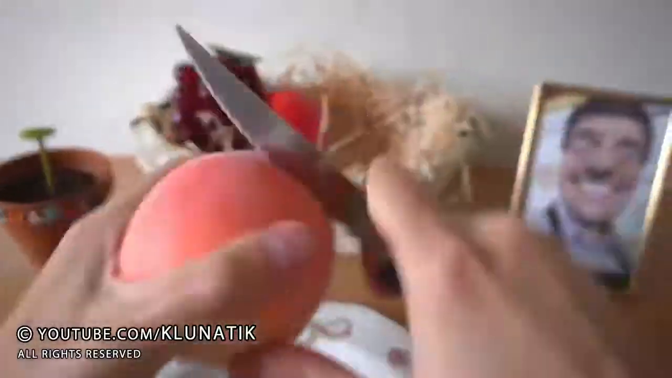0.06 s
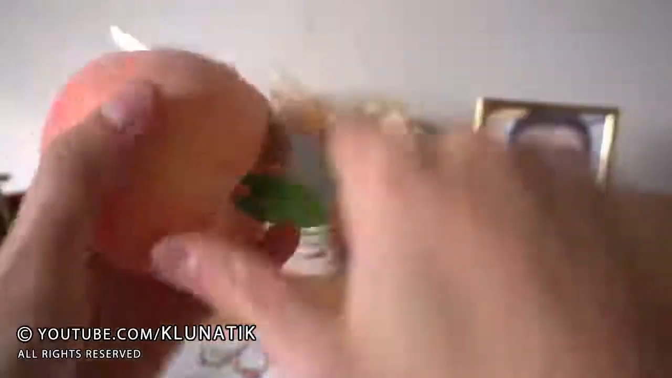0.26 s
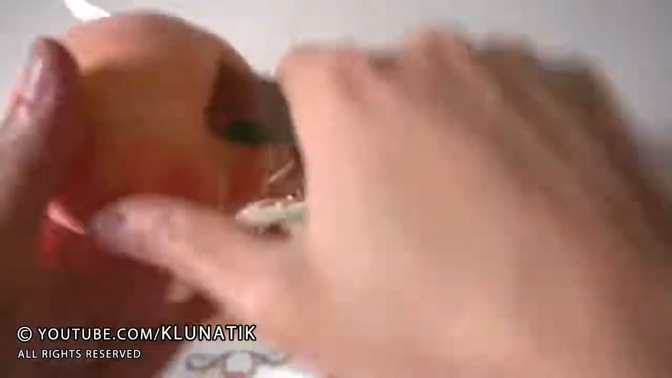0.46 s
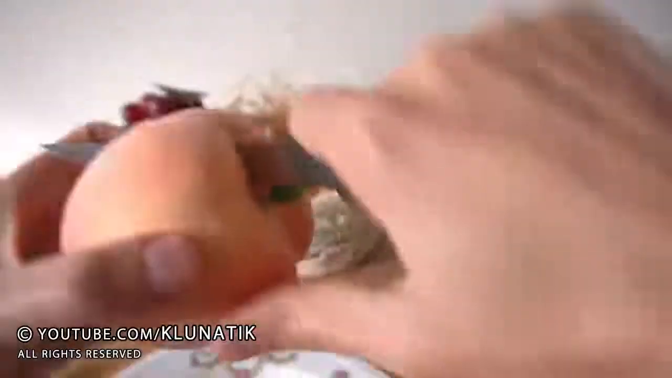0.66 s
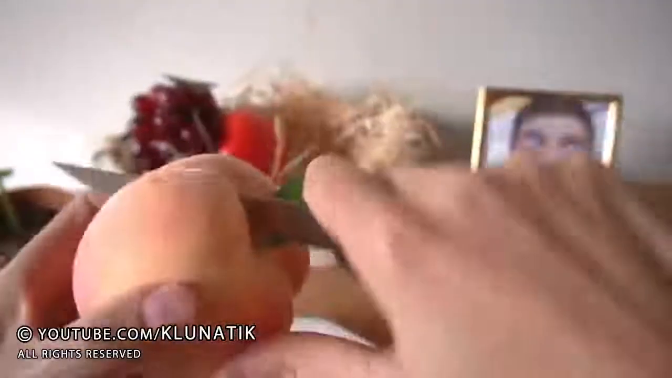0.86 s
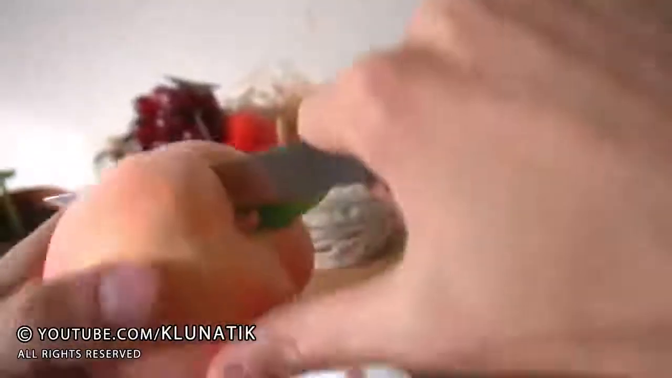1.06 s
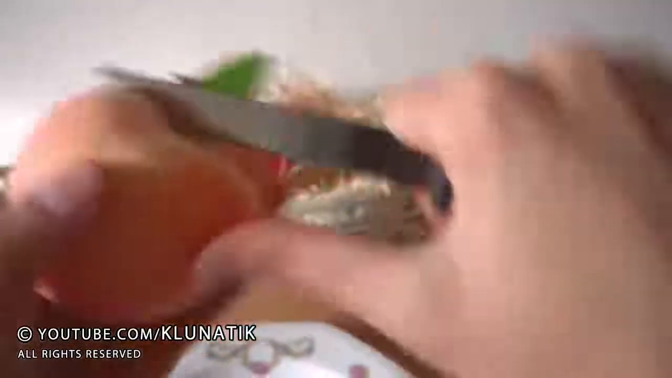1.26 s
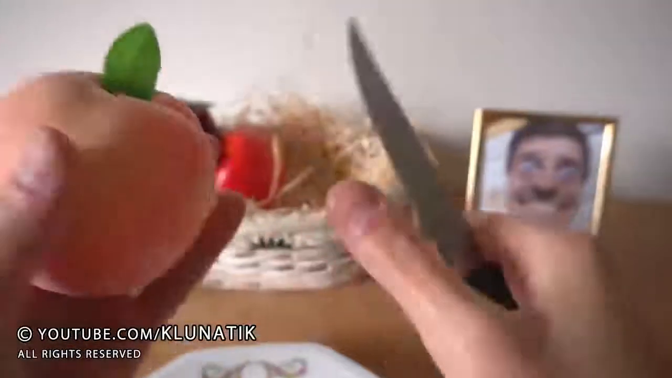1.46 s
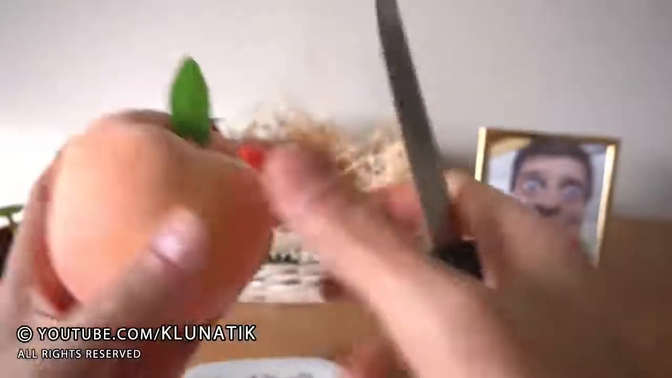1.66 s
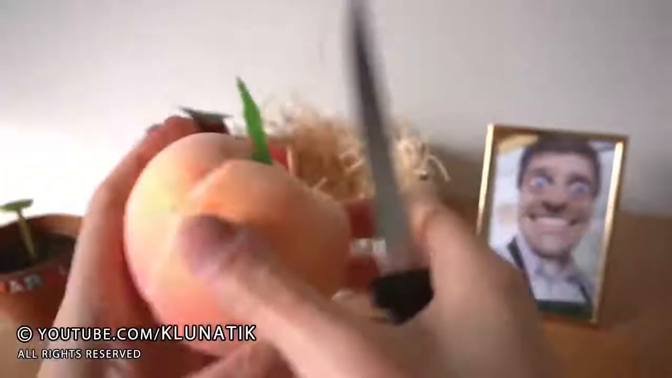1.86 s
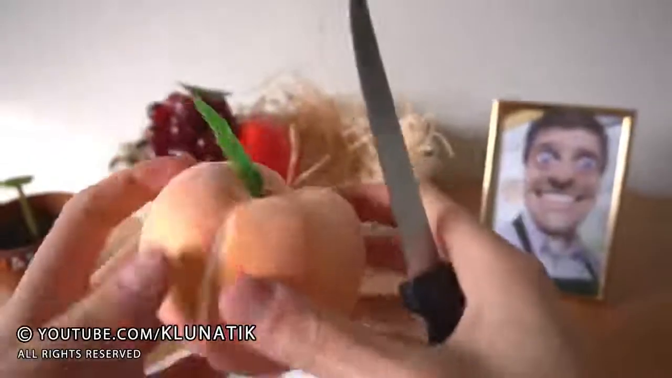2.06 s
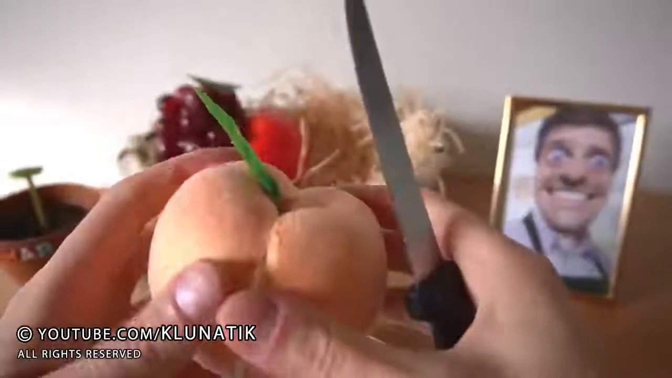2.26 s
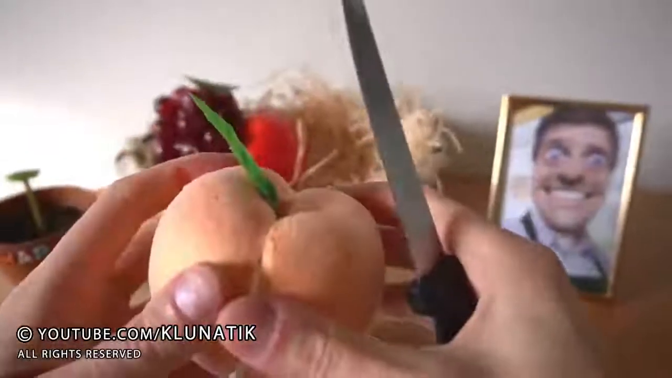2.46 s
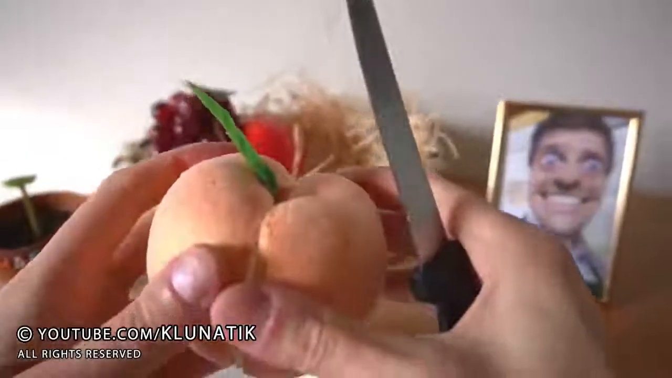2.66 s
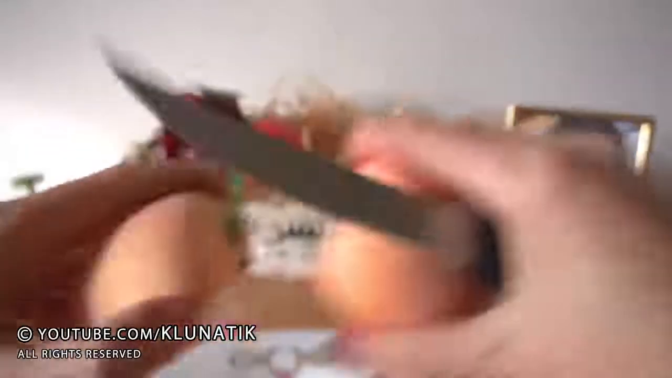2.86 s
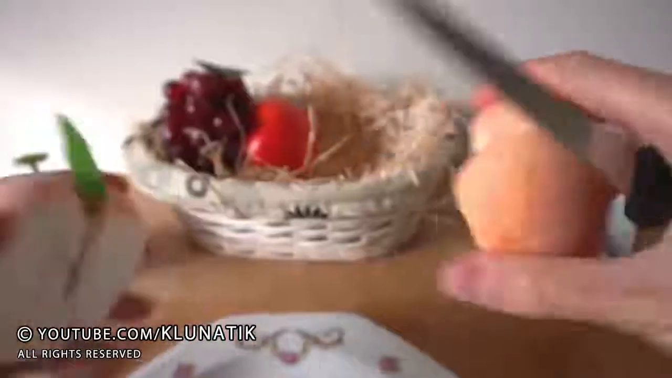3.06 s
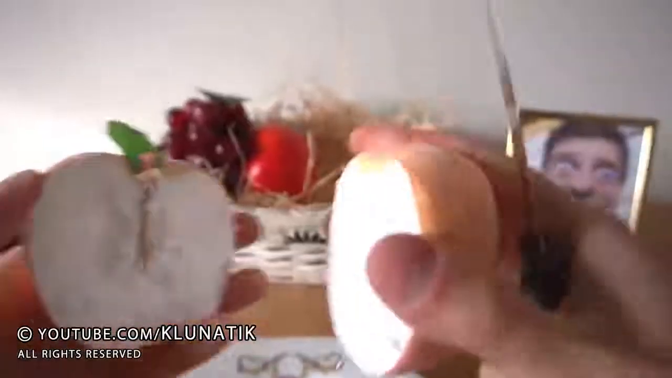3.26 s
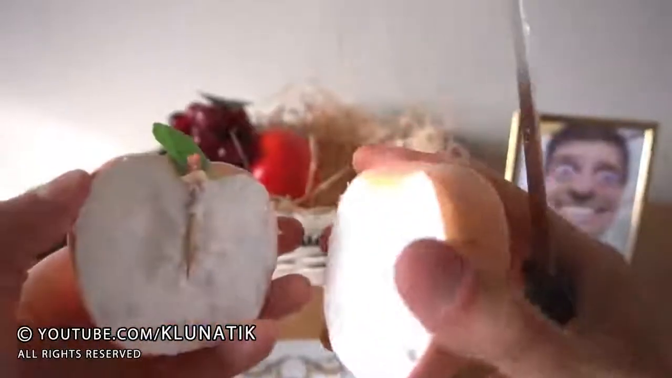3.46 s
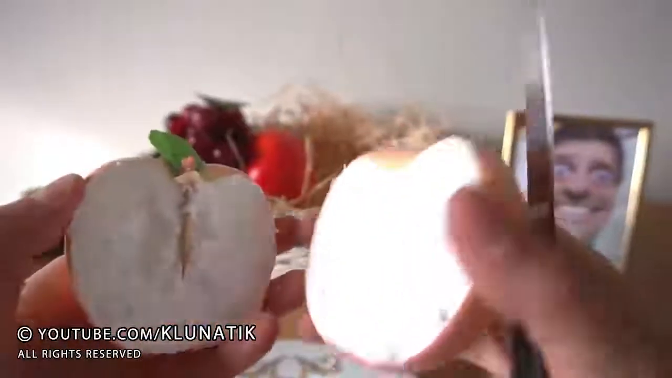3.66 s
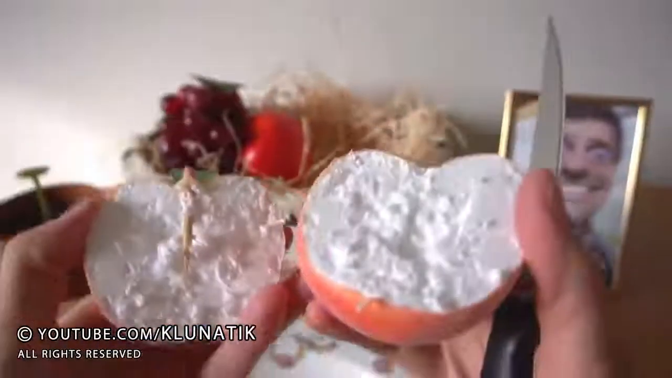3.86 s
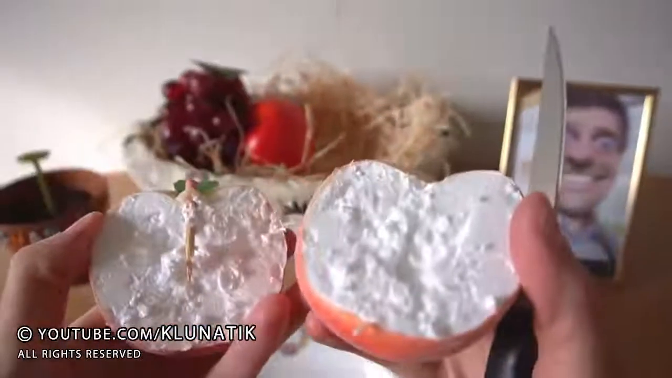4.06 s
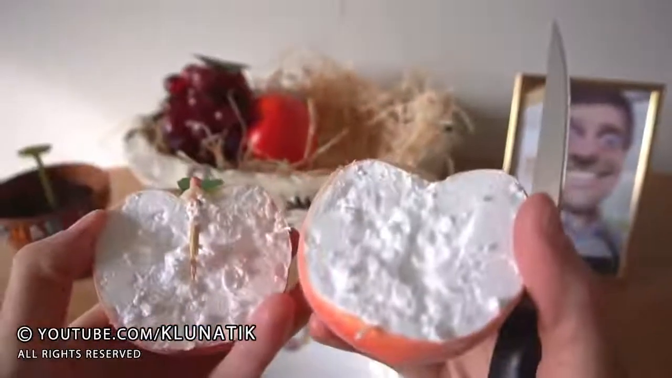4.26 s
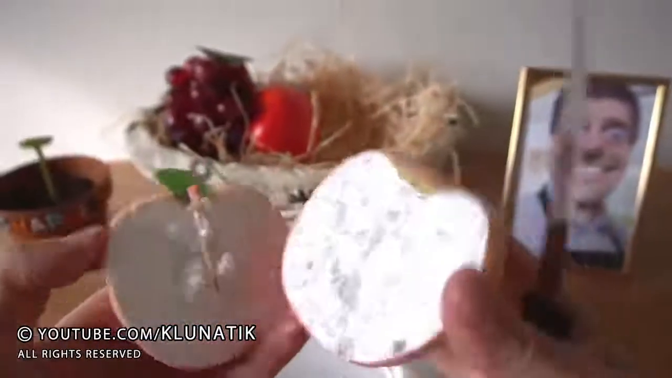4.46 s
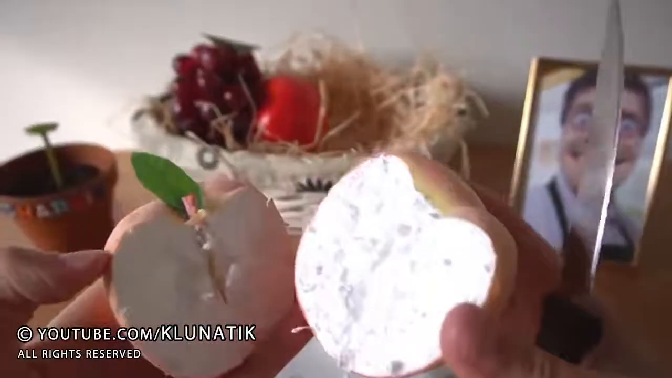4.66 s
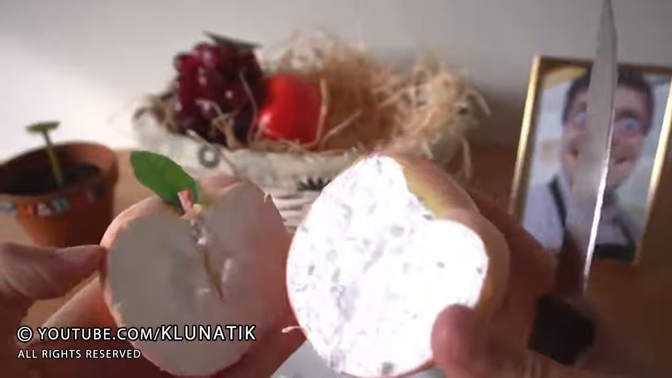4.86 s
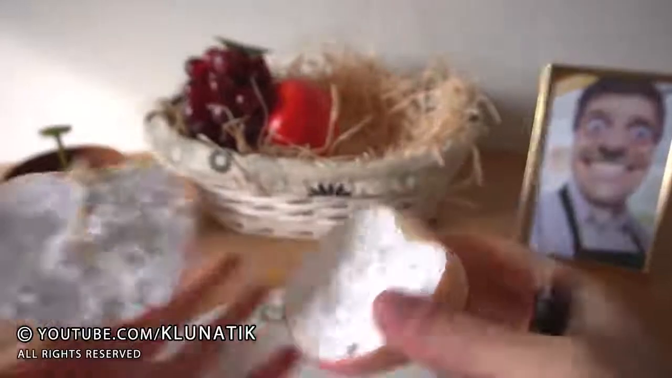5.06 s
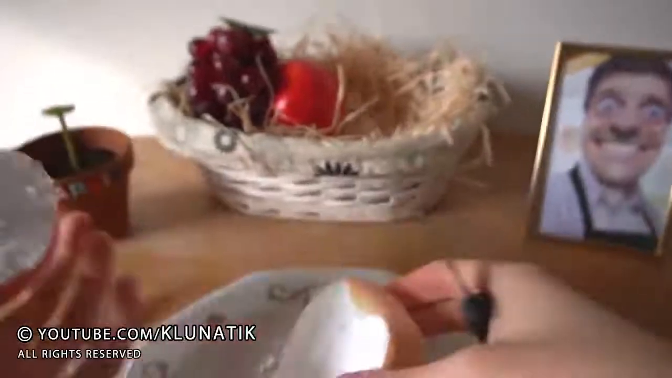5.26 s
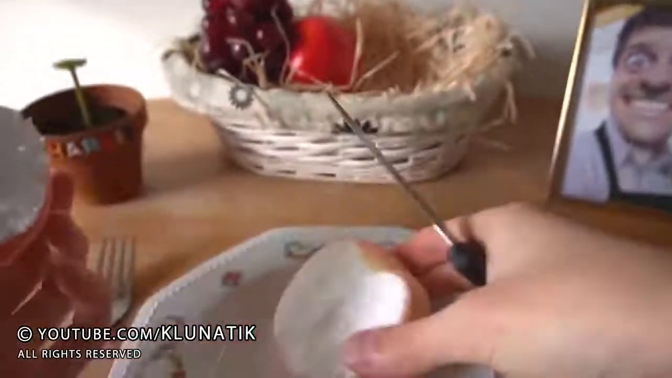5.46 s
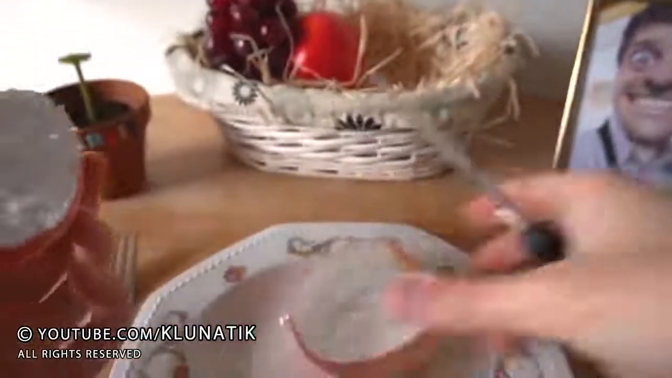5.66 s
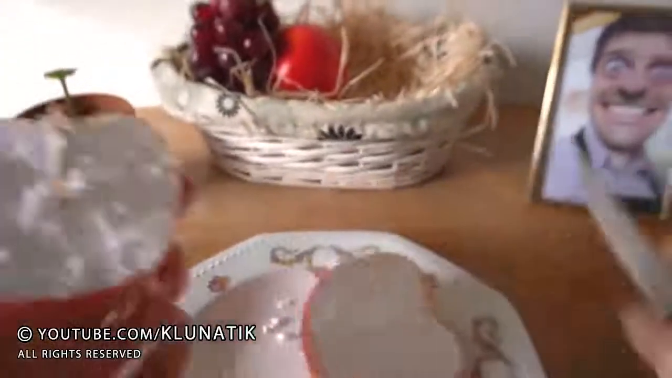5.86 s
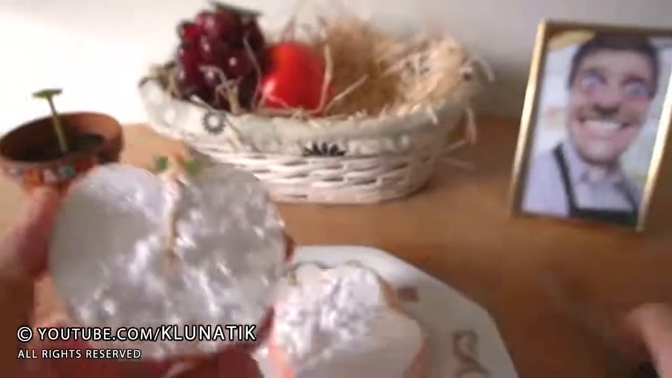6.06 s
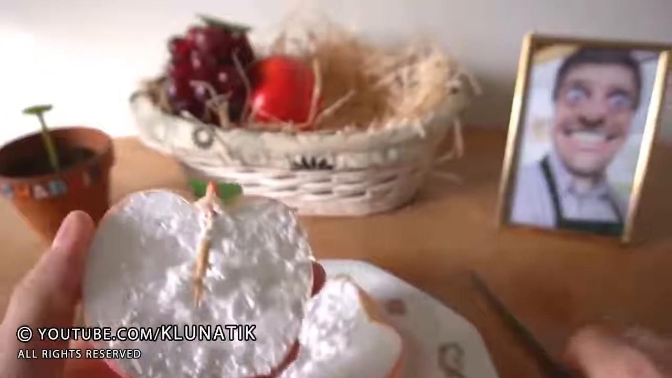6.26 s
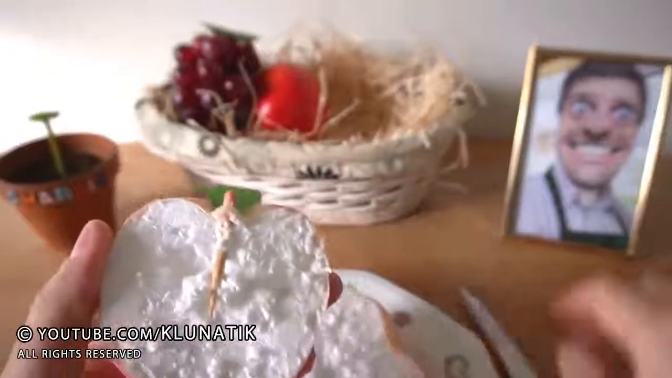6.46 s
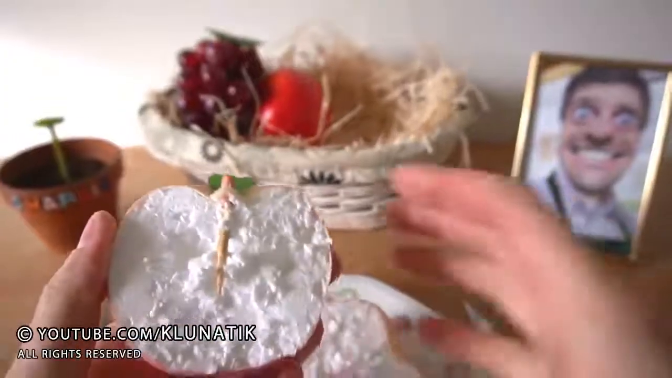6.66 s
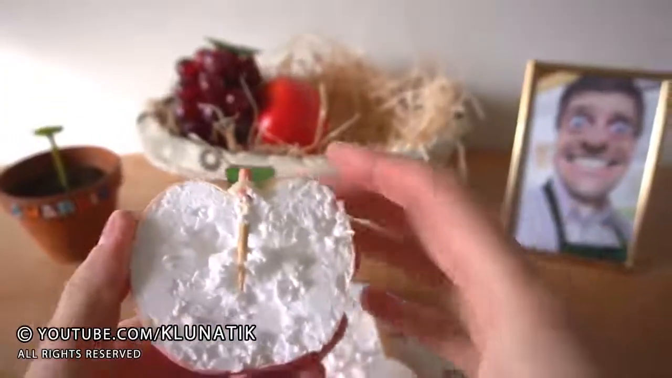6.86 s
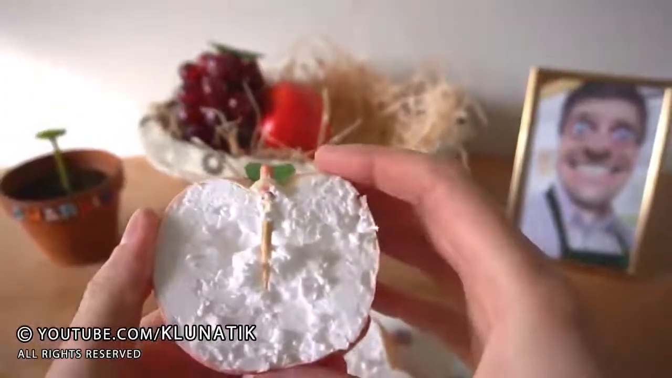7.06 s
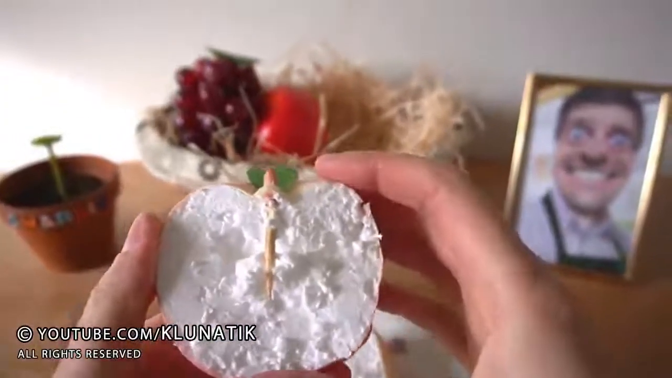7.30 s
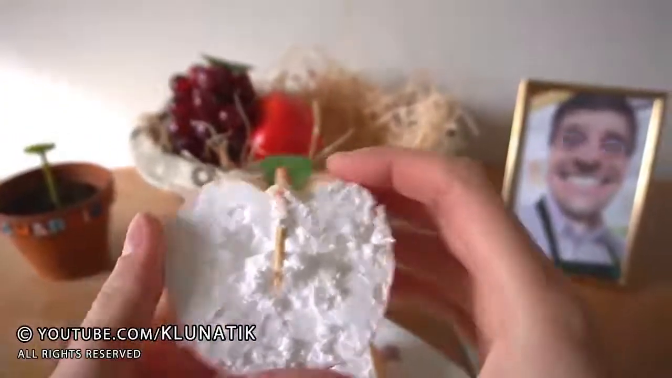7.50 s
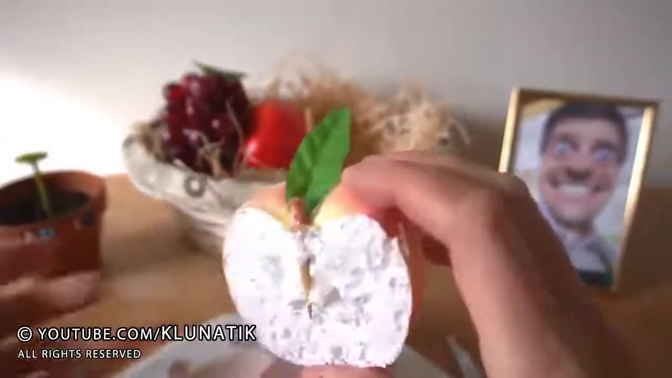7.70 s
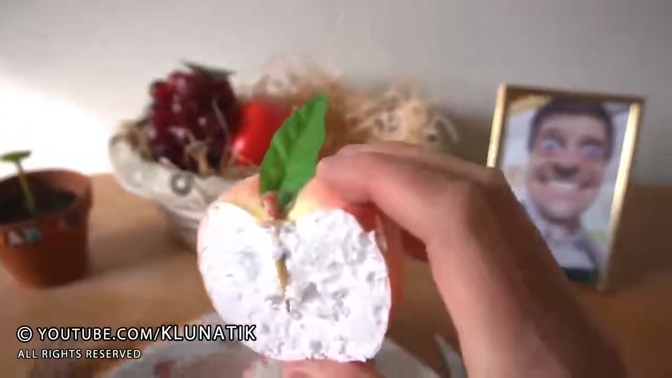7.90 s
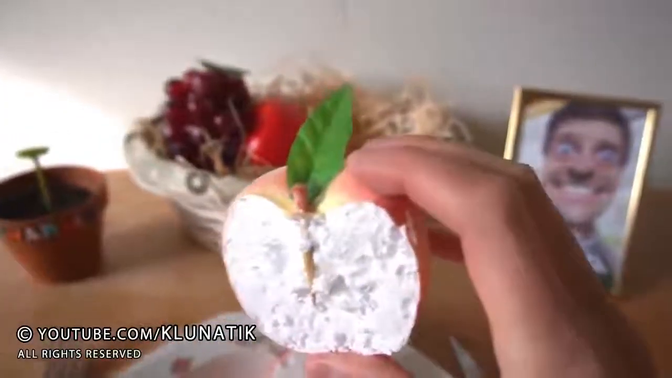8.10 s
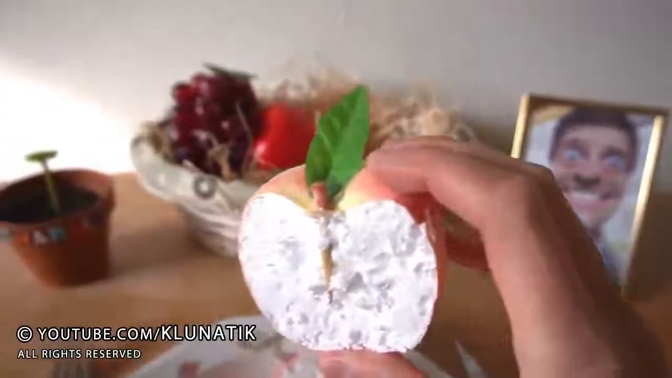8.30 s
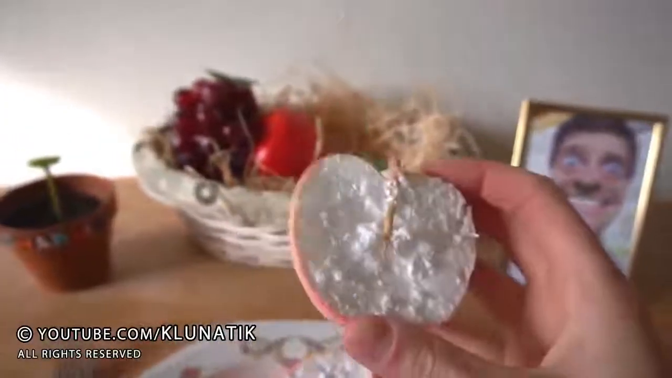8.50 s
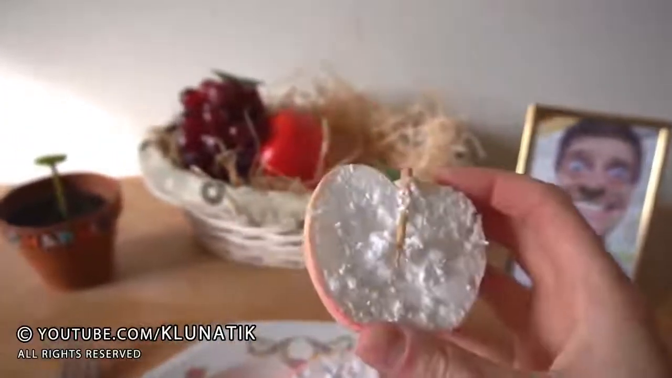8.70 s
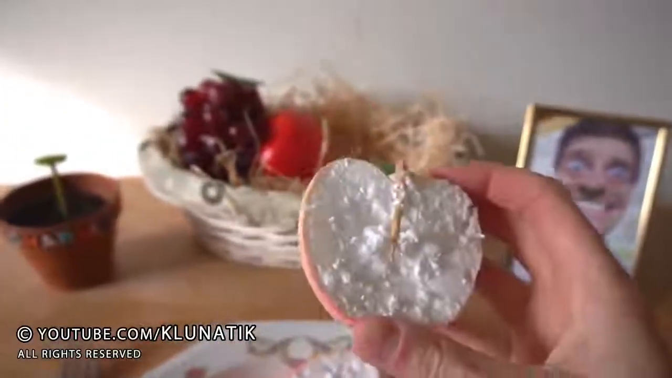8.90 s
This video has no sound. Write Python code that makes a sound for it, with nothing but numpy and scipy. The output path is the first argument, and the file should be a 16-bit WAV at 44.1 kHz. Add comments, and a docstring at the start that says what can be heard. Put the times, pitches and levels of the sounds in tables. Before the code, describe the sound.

A knife saws through crunchy foam, which cracks apart, then the knife clatters onto a wooden table.

```python
"""A close, dry scrape: a knife saws through a fake peach of rigid foam in a bare room.
Tiny cells burst in a crunch and fizz and foam walls snap; fingers prise the fruit until it creaks
and cracks in two, then rub the halves. The knife knocks down beside a china plate and rattles to
rest as the wooden table booms on. Faint rumble and hiss lie underneath."""
import sys
import numpy as np
from scipy import signal
from scipy.fft import rfft, irfft
from scipy.io import wavfile
from scipy.ndimage import uniform_filter1d

SR = 44100
rng = np.random.default_rng(int(sys.argv[2]) if len(sys.argv) > 2 else 0)


def output_pcm(signal):
    """Save a mono or channel-first signal as 16-bit PCM at the path in sys.argv[1].

    Samples are clipped to [-1, 1] before scaling.
    """
    pcm = np.clip(np.atleast_2d(signal).T, -1, 1) * 32767
    wavfile.write(sys.argv[1], SR, np.round(pcm).astype(np.int16))


N = 394244
TIME, FREQS = np.arange(N) / SR, np.fft.rfftfreq(N, 1 / SR)


def amp(db):
    """Decibels to gain."""
    return 10 ** (np.asarray(db) / 20)


def unit(x):
    """Scales to rms 1."""
    return x / np.sqrt(np.mean(x ** 2) + 1e-20)


def read(points, hz):
    """Reads a curve on a log-frequency axis."""
    f, value = np.transpose(points)
    return np.interp(np.log(hz + 1), np.log(f + 1), value)


def add(mix, s, sound):
    """Mixes a sound in at s seconds."""
    part = mix[..., round(s * SR):][..., :sound.shape[-1]]
    part += sound[..., :part.shape[-1]]


def colour(x, spectrum, size=2048):
    """Minimum-phase EQ, so that attacks stay sharp."""
    log_gain = np.log(amp(read(spectrum, abs(np.fft.fftfreq(size, 1 / SR)))))
    taps = np.fft.ifft(np.exp(np.conj(signal.hilbert(log_gain)))).real
    return signal.oaconvolve(x, taps[None], axes=1)[:, :x.shape[1]]


def pair(z, likeness):
    """Turns two unrelated signals into a partly alike left and right."""
    c = np.clip(likeness, 0, 1)
    return np.array([z[0], c * z[0] + np.sqrt(1 - c ** 2) * z[1]])


def press(gestures, grip_s=0.0087, let_go_s=0.012, sag_db_per_s=11.5, even_db=-59):
    """Power of crunch, hollow body and fizz as each push on the foam grips, slackens and lets go."""
    power = np.zeros((3, N))
    for start, length, db, hollow_db in gestures:
        t = np.arange(0, length + let_go_s, 1 / SR)
        gate = np.minimum(t / grip_s, 1) * np.clip(1 - (t - length) / let_go_s, 0, 1)
        effort = db - sag_db_per_s * t
        # fizz grows more slowly than crunch, and a deep, hollow cut muffles it
        fizz = even_db + 0.87 * (effort - even_db) - 0.28 * hollow_db
        add(power, start, (gate * amp([effort, effort + hollow_db, fizz])) ** 2)
    return power


# Saw strokes. Each row: start and length in seconds, effort in dB, hollow body in dB over effort.
STROKES = [(0.0, 0.078, -47.5, -6.5), (0.08, 0.03, -23.5, -9), (0.108, 0.047, -41, 3),
           (0.166, 0.16, -40, -12), (.33, .12, -41.5, -8.5), (0.459, 0.21, -44.5, -10.5),
           (0.733, 0.096, -38, -5), (0.947, 0.092, -43.5, -9), (1.053, .135, -43.5, -11.5),
           (1.194, .07, -36.5, -4), (1.26, 0.077, -29, -3.5), (1.354, 0.042, -39, -3.5),
           (1.416, 0.043, -43, -15), (1.506, 0.12, -52.5, -7.5)]


def sawing():
    """The blade pushes through the foam stroke by stroke; gives the power that drives foam()."""
    return press(STROKES)


# EQ for the foam's body, crunch and fizz. Each row: frequency in Hz, gain in dB.
HOLLOW = [(60, -39.5), (160, -13), (300, -1.5), (560, 0.5), (900, -1), (1300, 0.5), (2000, -5.5),
          (5000, -51)]
CRUNCH = [(500, -46.5), (1300, -13.5), (1700, -2), (2100, 1.5), (3100, 6.5), (4200, 4.5), (5300, -6.5),
          (7500, -20), (15000, -49.5)]
FIZZ = [(2000, -44.5), (4200, -15), (5700, -2.5), (8000, -0.5), (10000, -3.5), (13000, -4.5),
        (15000, -10.5)]
# Resonances of the fruit and the wedged blade. Each row: pitch in Hz, width in Hz, gain in dB.
FRUIT_MODES = [(620, 62, 1.5), (1956, 160, -2), (2397, 200, -2.5), (3000, 180, -16), (3930, 93, -6.5),
               (4954, 670, -2.5), (8240, 2200, -19)]


def foam(power, cells_per_s=7000, spread_db=2.5, clump_db=1.0, hiss=.45):
    """Tiny cells burst in clumps under blade and fingers: a crunch, fizz above it, hollow body below."""
    drift = uniform_filter1d(uniform_filter1d(rng.standard_normal(N), 300), 90)
    clumps = amp(clump_db * unit(drift))
    sizes = amp(spread_db * np.minimum(rng.exponential(1, N), 5))
    bursts = sizes * (rng.random(N) < cells_per_s / SR)
    cells = (unit(bursts) + hiss) * clumps * pair(rng.standard_normal((2, N)), 0.8)
    ring = 1 + sum(amp(db) / (1 + 2j * (FREQS - f) / width) for f, width, db in FRUIT_MODES)
    table_bounce = 1 + 0.1 * np.exp(-2j * np.pi * FREQS * .0023)
    cells = wander(irfft(rfft(cells) * ring * table_bounce, N))
    crunch, hollow, fizz = np.sqrt(power)
    body = pair(unit(colour(cells, HOLLOW)), 0.28)
    return crunch * unit(colour(cells, CRUNCH)) + hollow * body + fizz * unit(colour(cells, FIZZ))


def wander(x, depth_db=3):
    """As the contact slides, narrow parts of the spectrum swell and fade."""
    bands = signal.stft(x, SR, nperseg=256)[2]
    patches = uniform_filter1d(rng.standard_normal(bands.shape[1:]), size=3, axis=0)
    patches = unit(uniform_filter1d(patches, size=12, axis=1))
    return signal.istft(bands * amp(depth_db * patches), SR, nperseg=256)[1][:, :N]


# Stereo image of diffuse sound. Each row: frequency in Hz, left-right likeness from 0 to 1.
LIKENESS = [(30, 1), (200, 0.78), (500, 0.18), (1000, 0.26), (2500, 0.11), (15000, 0.069)]
# Reverb decay. Each row: frequency in Hz, seconds to fall 60 dB.
ROOM_T60 = [(100, 0.92), (500, 0.5), (2000, 0.53), (6000, 0.62), (14000, 0.54)]


def room(x):
    """Diffuse echoes of the bare walls, each band dying at its own speed; the bass stays central."""
    hz, t, bands = signal.stft(rng.standard_normal((2, SR)), SR, nperseg=256)
    bands = pair(bands, read(LIKENESS, hz)[:, None]) * amp(-60 * t / read(ROOM_T60, hz)[:, None])
    tail = signal.istft(bands, SR, nperseg=256)[1]
    tail *= np.clip((np.arange(tail.shape[1]) / SR - .004) / 0.013, 0, 1)  # pre-delay, then fade in
    return signal.fftconvolve(x, tail / np.linalg.norm(tail[0]), axes=1)[:, :N]


# Room tone EQ. Each row: frequency in Hz, gain in dB.
AIR = [(12, -40.5), (20, -6.5), (115, -4), (357, -13), (433, -12.5), (753, -14.5), (818, -13),
       (914, -16.5), (15000, -27.5)]


def air(bed_db=-59.5, hum_hz=112, hum_width_hz=6, hum_db=-74):
    """Faint room rumble with a low drone, and microphone hiss."""
    noise = pair(rfft(rng.standard_normal((2, N))), read(LIKENESS, FREQS))
    drone = unit(irfft(noise[0] / (1 + (2 * (FREQS - hum_hz) / hum_width_hz) ** 2), N))
    bed = unit(irfft(noise * amp(read(AIR, FREQS)), N))
    return amp(bed_db) * bed + amp(hum_db) * drone


# Dull bumps on blade, fingers and plate. Each row: start in seconds, level in dB, pitch in Hz.
BUMPS = [(.098, -26, 610), (.143, -25.5, 650), (.604, -34, 940), (1.223, -27.5, 346), (1.266, -31.5, 232),
         (1.371, -23.5, 566), (1.933, -44.5, 150), (2.183, -42, 573), (2.806, -34.5, 670),
         (5.391, -47, 165), (5.48, -49, 118), (5.555, -48, 200), (5.644, -44, 120)]


def bumps(swell_cycles=0.78):
    """The light fruit answers a shove with a few damped cycles."""
    out, t = np.zeros(N), np.arange(4096) / SR
    for s, db, hz in BUMPS:
        swell = t * hz / swell_cycles
        add(out, s, amp(db) * np.sin(2 * np.pi * hz * t) * swell * np.exp(1 - swell))
    return out


# Scuffs on the foam. Each row: start and length in seconds, effort in dB, fizz in dB over effort.
SCUFFS = [(0.165, .04, -38.5, 12), (2.717, .09, -52.5, 12.5), (3.623, 0.037, -56.5, 6),
          (3.697, 0.086, -52.5, 5.5), (3.777, 0.027, -52.5, 10.5), (3.832, 0.049, -48.5, 4),
          (4.465, 0.086, -49, 2), (4.59, 0.12, -63.5, 2), (5.062, 0.043, -55, 1),
          (5.338, 0.069, -52.5, -0.5), (5.377, .028, -35.5, 2.5), (5.497, 0.1, -52, -1),
          (5.612, 0.065, -56, -2), (5.846, .06, -57.5, 8.5), (7.038, 0.034, -50, 1), (7.117, 0.029, -61, 3),
          (7.183, 0.05, -49, 6), (7.482, 0.14, -64, 5)]


def scuffing():
    """Short fizzy scuffs on the foam, from the blade first, then fingers; gives power for foam()."""
    power = np.zeros((3, N))
    for start, length, db, fizz_db in SCUFFS:
        slip = np.sin(np.pi * np.linspace(0, 1, int(length * SR)) ** 0.8) ** 2  # fast in, slower out
        hollow_db = -28 + 0.66 * db
        add(power, start, amp([[db], [hollow_db], [db + fizz_db]]) ** 2 * slip)
    return power


# Foam cracks and blade ticks. Each row: start in seconds, level in dB, ring in Hz, depth from 0 to 1.
SNAPS = [(0.2606, -7, 3160, 0), (0.3483, -4, 2320, 0), (.371, -17.5, 2930, .4), (0.441, -19.5, 3980, 0.1),
         (0.7105, -24, 3000, 1), (.741, -20.5, 2600, 1), (1.2165, -14, 2700, 1), (1.2737, -6.5, 2180, 1),
         (1.28, -8, 2000, 0.95), (1.295, -11.5, 2700, 0.8), (1.304, -10.5, 1700, 0.74),
         (1.322, -16.5, 2000, 0.9), (1.6906, -22, 7500, .05), (2.554, -23.5, 7560, 0),
         (2.6764, -25, 5950, 0.03), (2.716, -27, 5960, .2), (2.8078, -6, 3270, 0.04),
         (2.883, -3.5, 4580, 0.52), (2.9085, -9.5, 2470, 0.77), (5.3845, -18.5, 2050, .9),
         (5.391, -19.5, 2230, .9), (6.477, -11, 10400, 0.4), (6.5617, -5.5, 8800, 0.47),
         (6.623, -16, 7600, 0.5), (6.688, -22, 7860, 0)]


def snaps(ring_cycles=2.5, crack_s=0.0011, crumble_s=0.0088):
    """A foam wall gives way: crack, brief ring, crumbs. Deep snaps are duller, crumblier and wetter."""
    near, send, t = np.zeros((2, N)), np.zeros((2, N)), np.arange(1024) / SR
    surface_eq = [(200, -34), (600, -17), (1350, -17), (1900, 1.5), (2500, -1), (3300, 2),
                  (5500, 3.5), (8000, 5), (15000, -2.5)]
    for s, db, hz, depth in SNAPS:
        spectrum = [(f, gain + depth * read([(2500, 0), (7000, -13)], f)) for f, gain in surface_eq]
        crack = 0.48 * np.exp(-t / crack_s)
        crumbs = (0.23 + .2 * depth) * np.exp(-t / crumble_s)
        grit = pair(rng.standard_normal((2, len(t))), 0.46) * (crack + crumbs)
        snap = grit + np.sin(2 * np.pi * hz * t) * np.exp(-t * hz / ring_cycles)
        add(snap, .0023, 0.088 * snap)  # bounce off the table top
        snap = colour(snap, spectrum)
        snap *= amp(db) / abs(snap).max()
        add(near, s, snap)
        # the walls get the crack as one broad click
        click = colour(np.exp(-t / .00003) * np.ones((2, 1)), spectrum)
        add(send, s, amp(-6 + 6.5 * depth) * snap.std() * unit(click))
    return near, send


# Tugs at the halves. Each row: start and length in seconds, effort in dB.
PULLS = [(1.705, 0.12, -64.5), (1.821, 0.081, -47), (1.909, 0.18, -48), (2.113, 0.1, -46.5),
         (2.227, 0.087, -46.5), (2.334, 0.084, -48), (2.485, 0.25, -56.5), (2.705, 0.078, -46.5),
         (2.773, 0.045, -35.5), (2.849, 0.11, -35)]


def prising(hollow_db=-14.5):
    """Fingers pull at the halves, hardest as they part; gives power for foam()."""
    return press([(*pull, hollow_db) for pull in PULLS])


# The creak's resonances. Each row: pitch in Hz, width in Hz, gain in dB.
CREAK_MODES = [(230, 150, -12.5), (570, 110, -10.5), (761, 32, 0.5), (1340, 190, -8.5), (1594, 260, -2.5)]


def creak(start_s=2.372, rise_s=0.038, level_db=-39, fade_db_per_s=120):
    """Uneven slips between the prised halves excite a soft, hollow creak that swells and dies."""
    body = sum(amp(db) / (1 + 2j * (FREQS - f) / width) ** 2 for f, width, db in CREAK_MODES)
    slips = unit(irfft(rfft(pair(rng.standard_normal((2, N)), 0.9)) * body, N))
    t = TIME - start_s
    return slips * np.clip(t / rise_s, 0, 1) * amp(level_db - fade_db_per_s * np.maximum(t - rise_s, 0))


# Foam and knife hit plate and table. Each row: start in seconds, level in dB, clack pitch in Hz,
# then wooden body, table ring and reverb send, each as a trim in dB.
KNOCKS = [(5.385, -42.5, 1900, -12, -9.5, 6.5), (5.55, -55.5, 2174, 2.5, 6.5, 5.5),
          (6.0054, -13, 2597, -8.5, -1.5, 11.5), (6.1818, -17, 760, 5, 1, 4),
          (6.2299, -7.5, 1501, -18.5, -4.5, 1), (6.3085, -16.5, 1500, -2, 1.5, -4.5),
          (6.462, -10, 1300, 1, 4, 4), (6.469, -7.5, 1800, -1.5, -6, 4.5),
          (6.6875, -17.5, 1200, -8, 3, -5.5)]
# EQ shared by all knocks. Each row: frequency in Hz, gain in dB.
KNOCK_EQ = [(40, -43), (100, -25.5), (230, -16), (350, -12), (480, -7.5), (560, 1), (1100, -5), (1500, -7),
            (2600, -4.5), (3600, -8), (7000, -7), (15000, -6.5)]
# EQ that follows the clack's pitch. Each row: multiple of that pitch, gain in dB.
CLACK_EQ = [(.8, 0), (1.12, -2.5), (1.6, -11), (2.6, -24.5), (5, -46), (10, -52.5)]
# Ring of table and plate. Each row: pitch in Hz, level in dB, seconds to fall 60 dB.
TABLE_MODES = [(108, -16, .9), (119, -19, .6), (129, -18, .55), (168, -18, .5), (241, -14, .45),
               (550, -9, .33), (587, -12, .34), (655, -19, .3), (721, -20, .3), (913, -19, .35),
               (952, -14, .38), (1163, -21, .28), (1300, -18, .32), (1410, -18, .35), (1470, -17, .28),
               (1529, -19, .28), (1675, -19, .28), (1766, -20, .26), (1935, -21, .24)]


def knocks(contact_t60=0.036, ring_db=-2.0, crossfeed=0.21):
    """Each blow gives a short clack, pitched by where it lands, and sets table and plate ringing."""
    near, send, rings, t = np.zeros((2, N)), np.zeros((2, N)), np.zeros(N), np.arange(SR) / SR
    hz, mode_db, t60 = np.transpose(TABLE_MODES)[:, :, None]
    modes = amp(mode_db - 60 * t / t60) * np.exp(2j * np.pi * hz * t) * (1 - np.exp(-t / 0.01))
    for s, db, clack_hz, body_db, table_db, room_db in KNOCKS + rocking():
        spectrum = [(clack_hz / 2, body_db)] + [(clack_hz * k, gain) for k, gain in CLACK_EQ]
        noise = pair(rng.standard_normal((2, 8192)), 0.94)
        clack = unit(colour(colour(noise, KNOCK_EQ), spectrum))
        clack *= amp(db - 60 * t[:8192] / contact_t60)
        add(near, s, clack)
        # the walls get the blow as one smooth click of the same colour
        impulse = np.eye(1, 8192) * np.ones((2, 1))
        click = colour(colour(impulse, KNOCK_EQ), spectrum)
        add(send, s, amp(room_db) * clack.std() * unit(click))
        # every blow lands on another spot, so the modes start in other phases
        spot = np.exp(2j * np.pi * rng.random(len(TABLE_MODES)))
        add(rings, s, amp(db + table_db + ring_db) * (spot @ modes).real)
    echo = room(send)
    echo = (1 - crossfeed) * echo + crossfeed * echo[::-1]  # narrowed: the whole table top radiates
    return (near + echo) * amp([[-.6], [.6]]) + rings


def rocking(count=8, start_s=6.5005, gap_s=.021, jitter_s=.0015, blade_hz=1750, fade_db_per_s=56):
    """The dropped knife rocks between blade and handle, ever weaker; gives more rows for knocks()."""
    pitch_luck, time_luck = rng.standard_normal((count, 2)).T
    elapsed = gap_s * np.arange(count)
    handle = np.arange(count) % 2  # every second blow: lower, with more wood
    starts = start_s + elapsed + jitter_s * time_luck
    levels = -9.5 - fade_db_per_s * elapsed
    pitches = blade_hz * 0.87 ** handle * np.exp(.05 * pitch_luck)
    body_db, room_db = -9 + 5 * handle, np.full(count, 7)
    table_db = -4.5 + 39.5 * elapsed  # the flatter it lies, the more goes into the table
    return list(zip(starts, levels, pitches, body_db, table_db, room_db))


def boom(start_s=6.645, level_db=-27.5, rise_s=0.028):
    """The table's lowest note swells and booms on as the rattle ends."""
    hz, _, t60 = TABLE_MODES[0]
    t = np.maximum(TIME - start_s, 0)
    return amp(level_db - 60 * t / t60) * np.sin(2 * np.pi * hz * t) * (1 - np.exp(-t / rise_s))


def scene():
    """The foam is close and fairly dry, a little to the left; the table fills the room."""
    scraping = foam(sawing() + scuffing() + prising()) + creak()
    cracks, crack_send = snaps()
    fruit = scraping + cracks + bumps() + room(amp(-5.0) * scraping + crack_send)
    return fruit * amp([[.4], [-.4]]) + knocks() + boom() + air()


def record(dry, threshold_db=-17, slope=0.47, recovery_db_per_s=70, edge_hz=15300):
    """Gain control squashes the loud knocks and recovers quickly; a low-pass trims the top."""
    power_db = 10 * np.log10(abs(uniform_filter1d((dry ** 2).mean(0), size=256, origin=80)) + 1e-12)
    fall = TIME * recovery_db_per_s
    held_db = np.maximum.accumulate(power_db + fall) - fall
    over_db = np.maximum(held_db - threshold_db, 0)
    ducked = dry / amp(slope * uniform_filter1d(over_db, size=64))
    low_pass = signal.firwin(201, edge_hz, window=("kaiser", 9), fs=SR)
    return signal.oaconvolve(ducked, low_pass[None], "same")


dry = scene()
out = record(dry)
output_pcm(out)
```